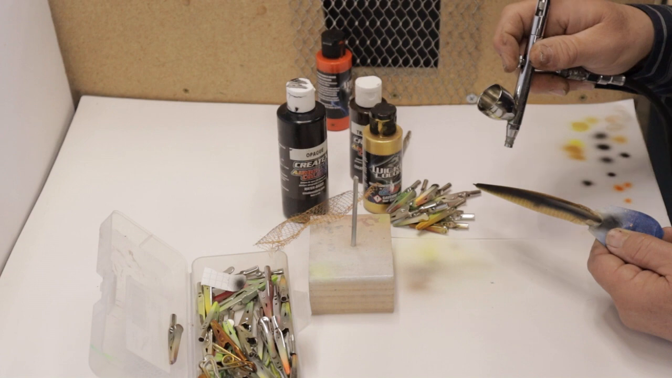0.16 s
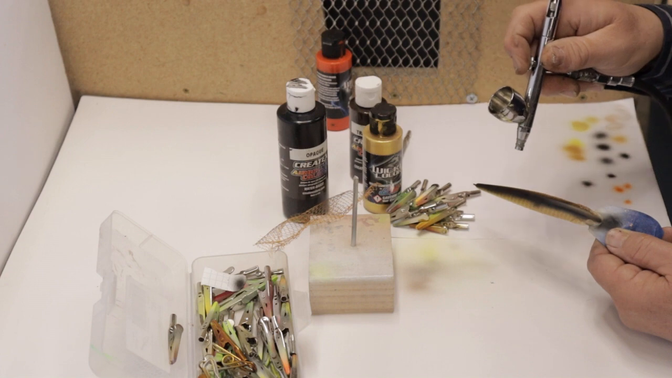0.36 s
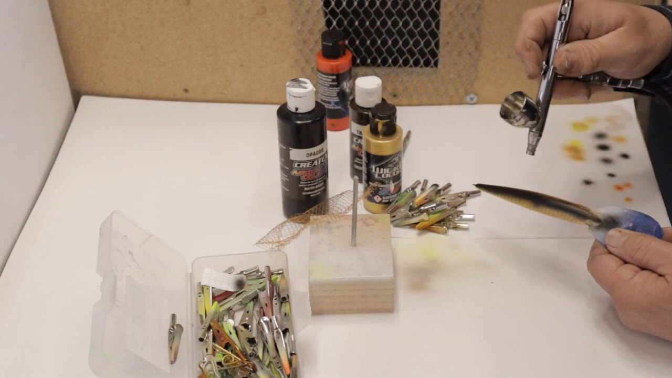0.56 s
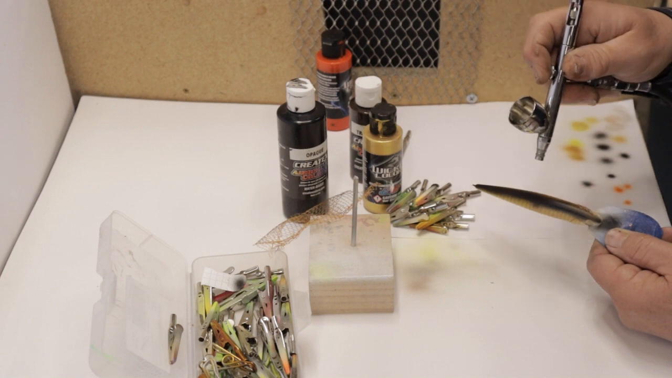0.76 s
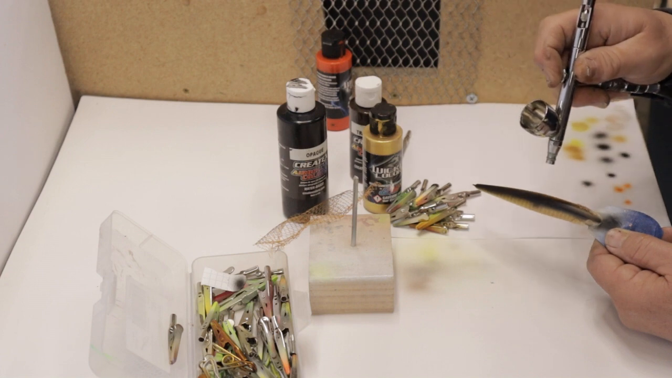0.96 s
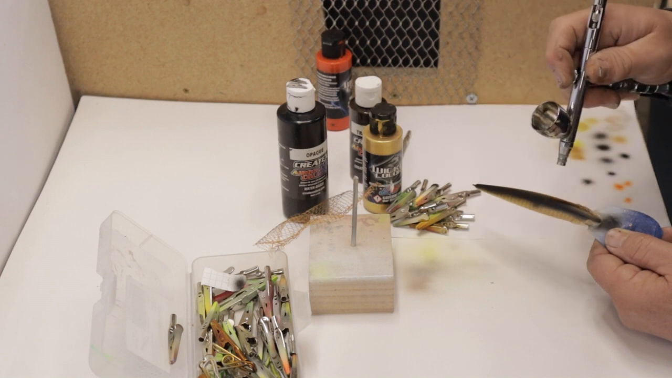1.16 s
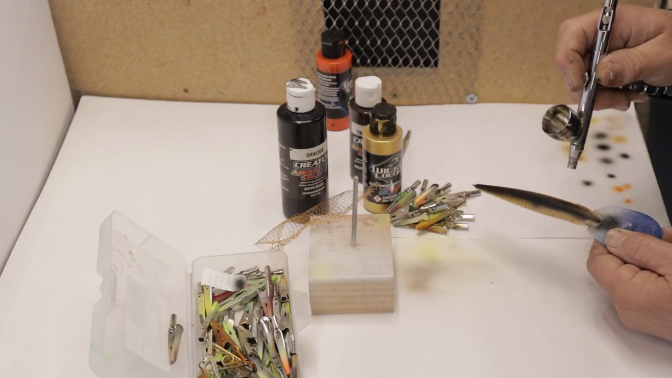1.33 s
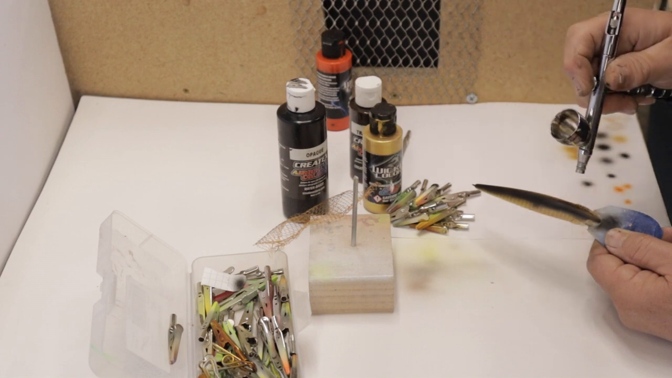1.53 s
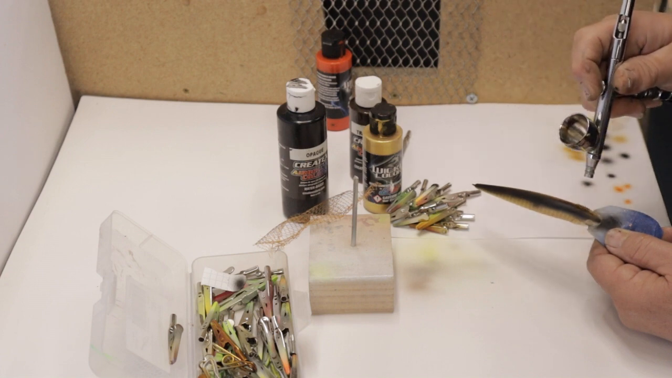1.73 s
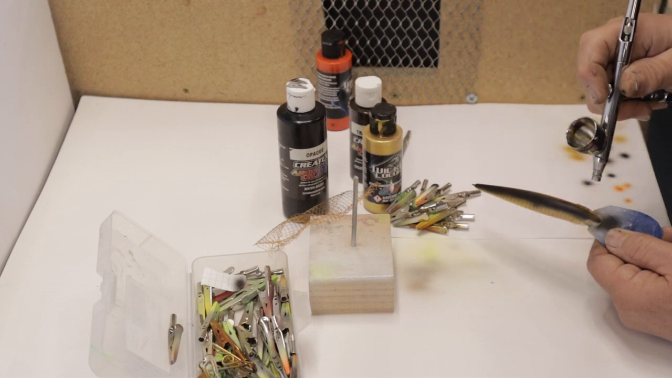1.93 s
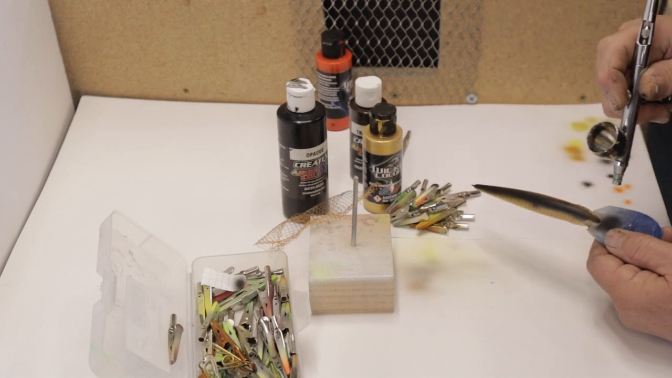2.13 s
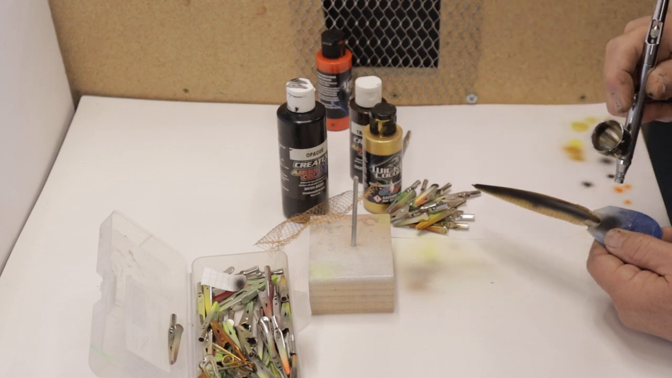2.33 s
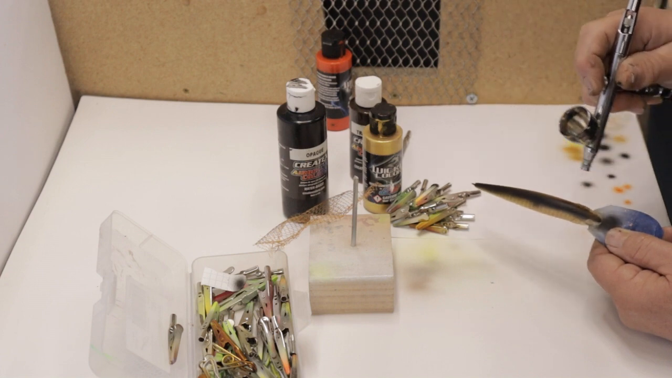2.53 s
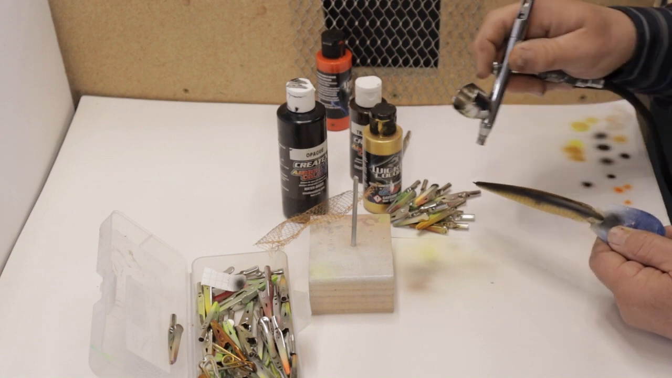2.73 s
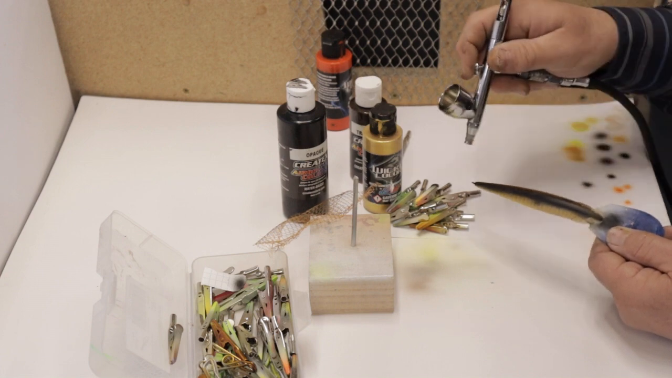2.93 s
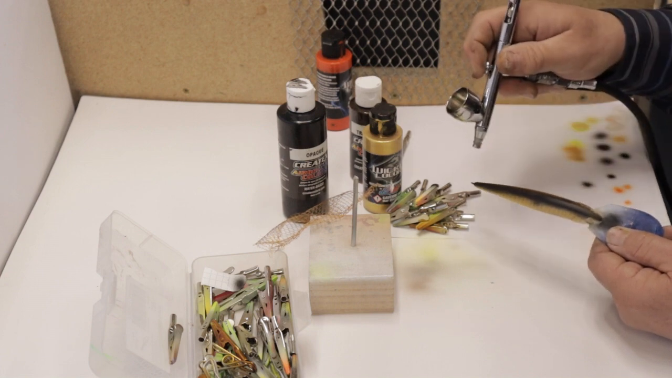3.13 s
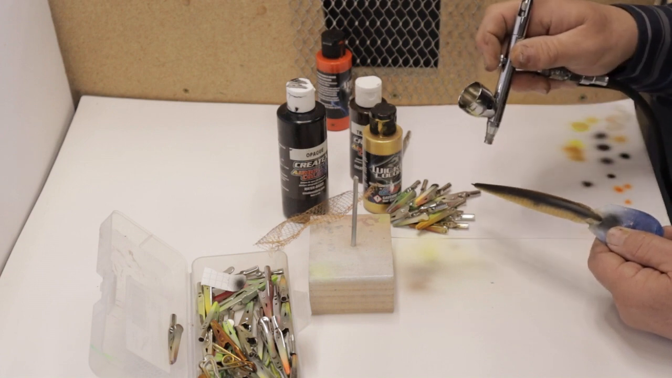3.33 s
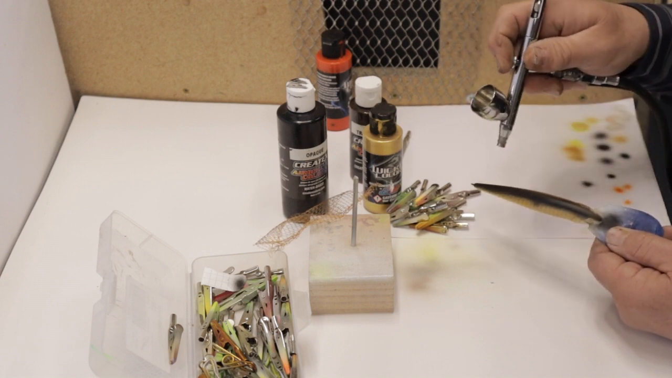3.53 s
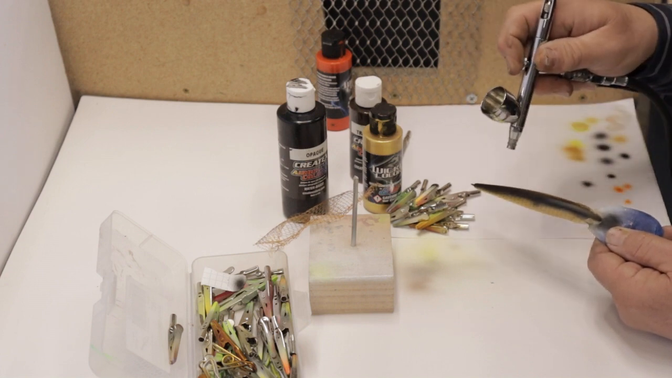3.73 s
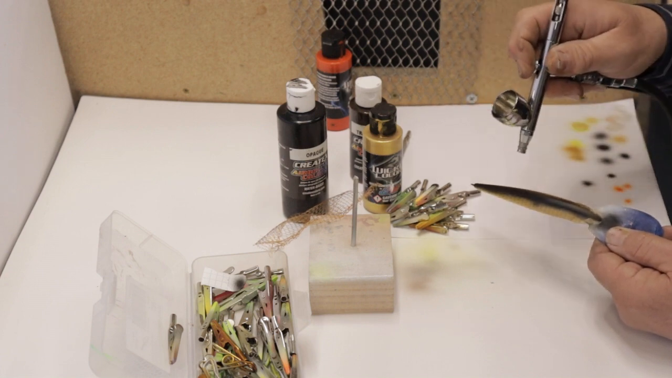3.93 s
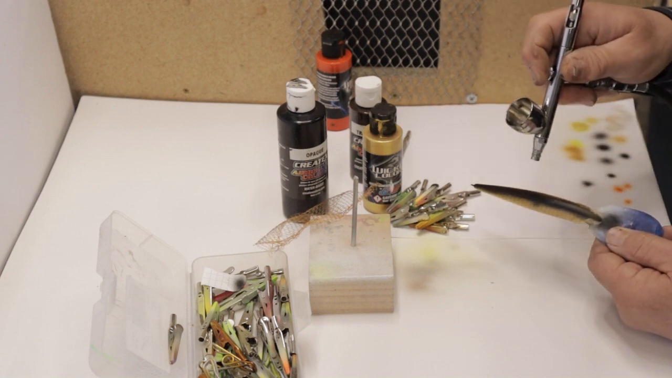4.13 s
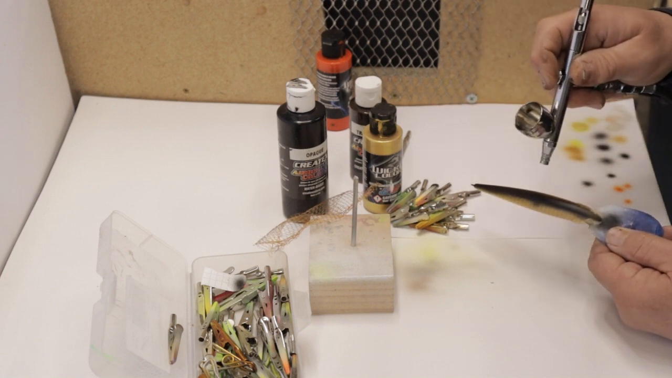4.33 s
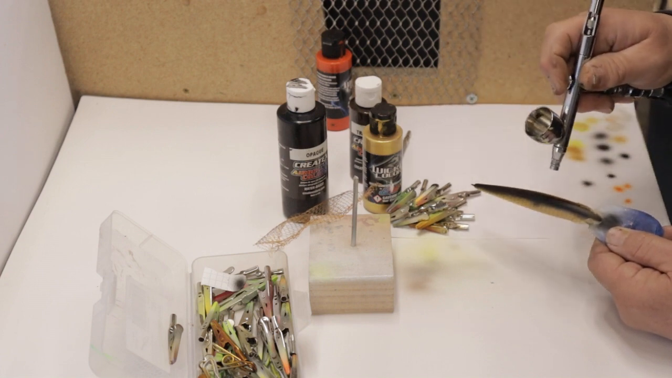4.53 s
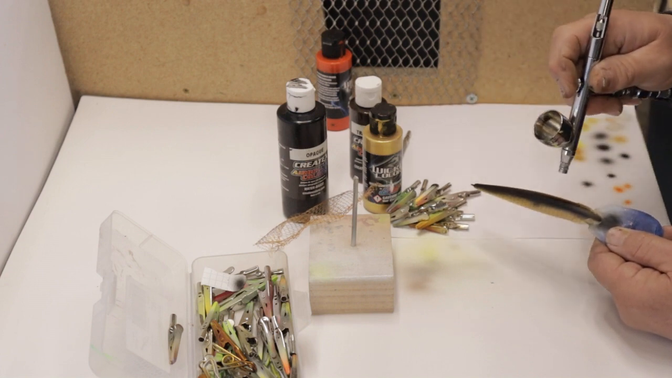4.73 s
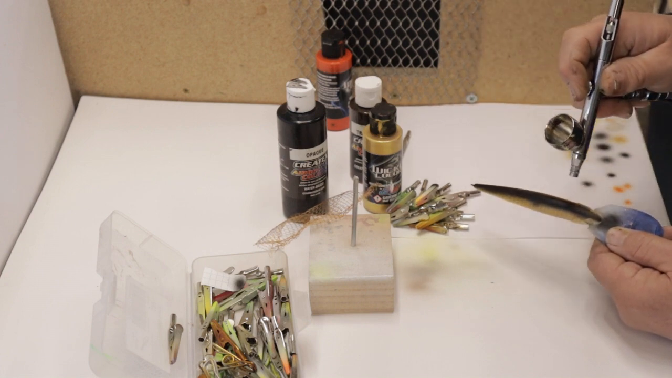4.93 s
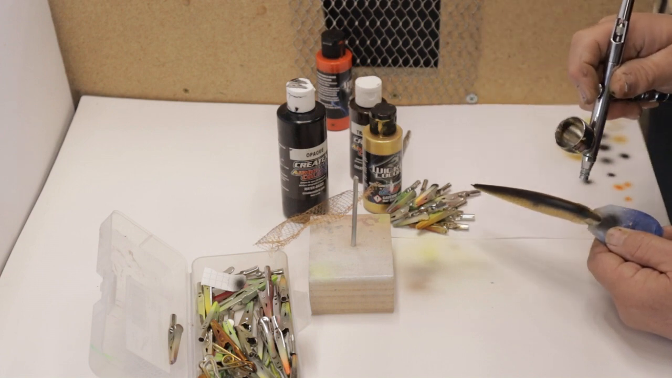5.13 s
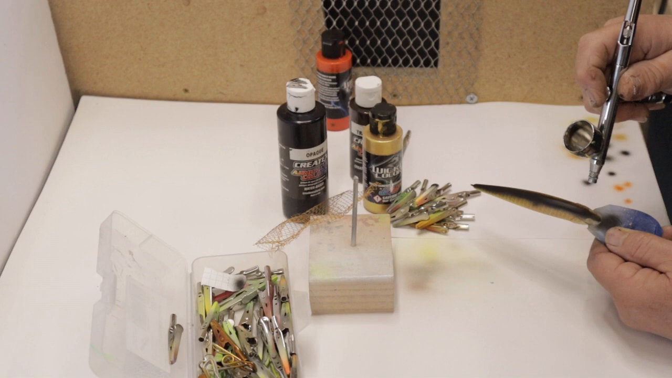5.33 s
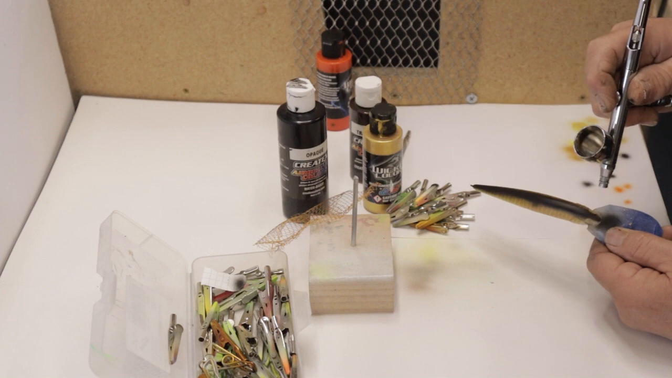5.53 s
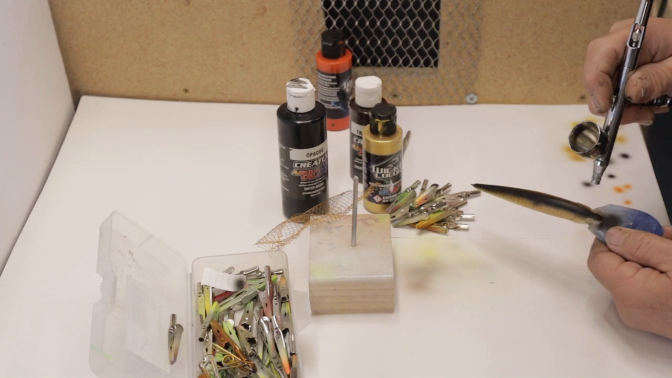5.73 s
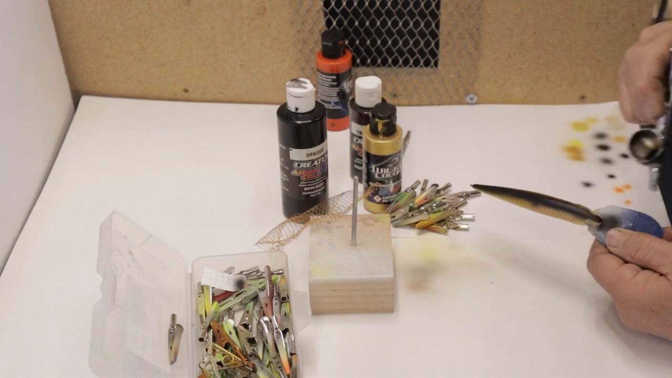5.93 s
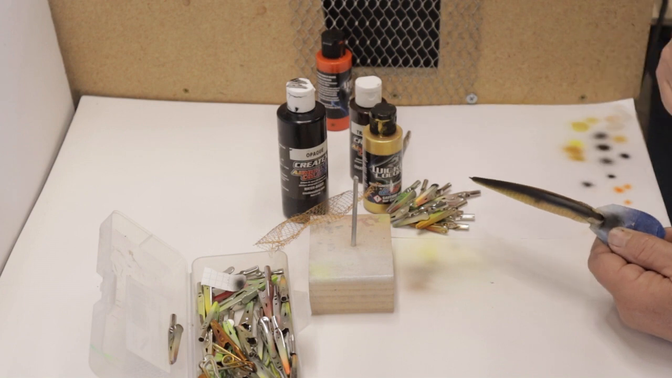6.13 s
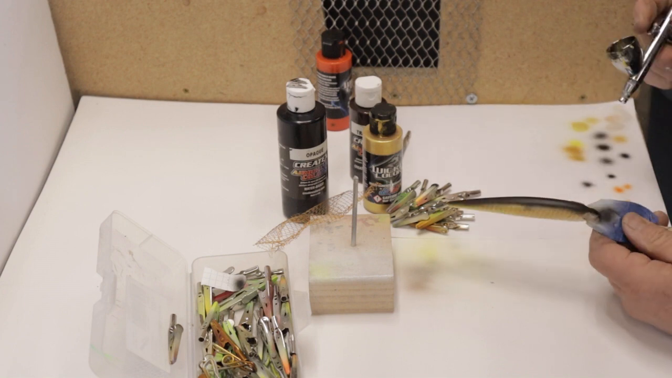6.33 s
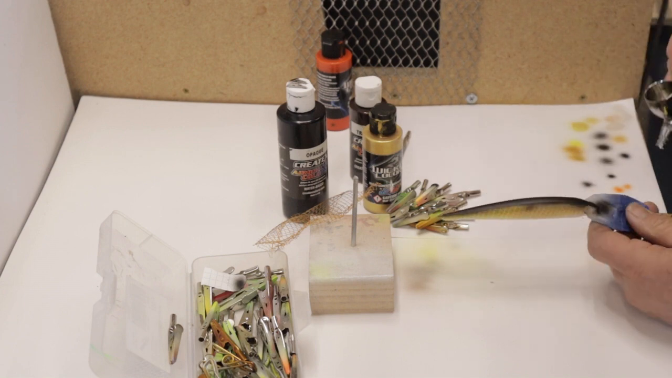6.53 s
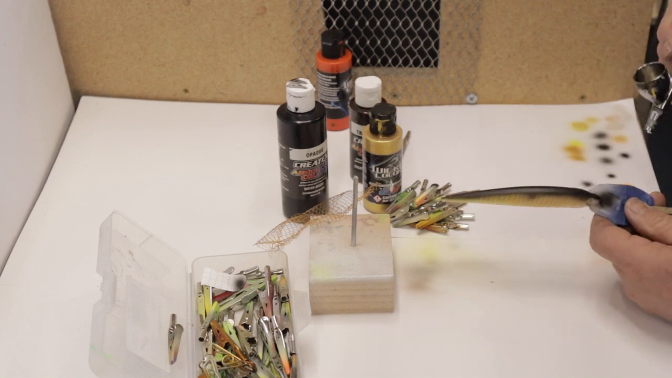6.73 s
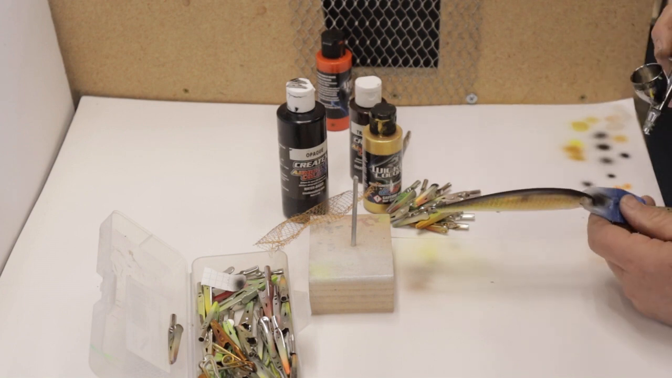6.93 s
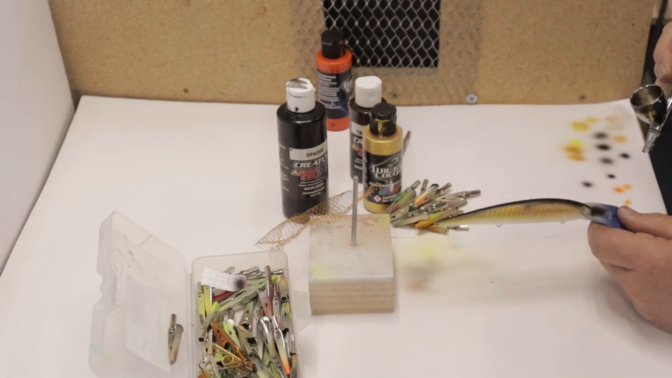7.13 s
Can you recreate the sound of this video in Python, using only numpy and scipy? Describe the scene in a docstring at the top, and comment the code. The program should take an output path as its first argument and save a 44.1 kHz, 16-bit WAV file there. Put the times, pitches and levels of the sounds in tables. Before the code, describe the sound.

An airbrush sprays onto paper in a small booth with a steady, airy hiss that shifts in tone as the hand moves. It cuts off, gives a short puff, then makes a second long pass and another quick puff. Soft handling bumps and light metal ticks follow, then one brief, differently toned puff on a fishing lure. The sound is close, over a low ventilation rumble.

```python
"""Airbrush in a small booth

Two long passes and two short puffs hit a sheet of paper, then one puff hits a fishing lure.
The nozzle hisses while the trigger is down. The jet roars where it lands, brighter as the nozzle
comes closer, and the booth colours that roar as the hand moves. Between the bursts come soft
handling bumps and metal ticks, all over the low rumble of a workshop."""
import sys
import numpy as np
from scipy import signal
from scipy.fft import rfft, irfft
from scipy.io import wavfile
from scipy.ndimage import uniform_filter1d

SR = 44100
rng = np.random.default_rng(int(sys.argv[2]) if len(sys.argv) > 2 else 0)


def master(y):
    """Save y as 16-bit WAV."""
    cut = np.clip(np.atleast_2d(y).T, -1, 1)
    pcm = np.round(cut * 32767)  # scale
    wavfile.write(sys.argv[1], SR, pcm.astype(np.int16))


N = 321048
TIME = np.arange(N) / SR
FRAME = 1024  # samples in one slice of the moving filter
LEAD_S = 2 * FRAME / SR  # the hand takes up each stroke this long before the air comes on

# "Closeness" runs from 0 (far away) to 1 (touching the paper).
# "Place" runs from 0 (middle of the bench) to 1 (side wall). "Body" is the low part of the roar.

# Trigger presses: on_s, off_s, opening_s, closing_s
BURSTS = [(-.1, 2.333, .005, .012), (2.52, 2.747, .005, .012), (3.177, 5.836, .016, .014),
          (5.936, 6.073, .005, .014), (6.91, 7.026, .006, .013)]
# Tone of the jet on paper, before the stroke's level is added: pitch_hz, far_db, close_db
PAPER_ROAR = [(248, -21, -29.5), (380, -9.1, -21.5), (501, -11.5, -19.5), (785, 2.5, -15.5), (1200, -3, -7),
              (1600, 3, -9), (2260, 3, -5.5), (3530, -6, -1.0), (5000, -15, -1.5), (8450, -32.5, -3.5),
              (12000, -43.5, -10), (15500, -46.5, -13.5)]
# Air leaving the nozzle: pitch_hz, level_db_per_hz
NOZZLE_HISS = [(250, -71.5), (600, -73.5), (1400, -75), (3500, -69), (6400, -69), (10500, -70),
               (15500, -75)]
# The jet breaking over the lure: pitch_hz, level_db_per_hz
LURE_ROAR = [(250, -63), (700, -53.5), (1050, -45.5), (1550, -46.5), (2000, -49.5), (2550, -55),
             (3200, -48.5), (3650, -51.4), (4150, -48.5), (4900, -54.5), (7200, -60), (8200, -57),
             (11000, -68), (15500, -74.2)]
# Narrow peaks and dips in that sound: pitch_hz, width_hz, gain_db
LURE_PEAKS = [(1540, 170, 4), (2250, 150, -2), (4230, 200, 3.5), (4520, 220, -7), (13400, 900, 4)]
# One hand stroke per burst on paper: start_s, at_wall_s, start_place, level_db, body_db, hollowness
STROKES = [(0.0, 2.02, 0.0, -50.7, 0, 0.69), (2.52, 2.9, 0.52, -52.5, 5, -.35),
           (3.63, 5.33, 0.06, -49.7, -.5, 1.2), (5.85, 5.93, .9, -50.5, -3, 0)]
# How the nozzle rises and sinks, one list of points per stroke: time_s, closeness
CLOSENESS_PATHS = [
    [(0, 0.57), (.35, 0.31), (.52, 0.05), (.72, 0.05), (.88, 0.24), (1.5, 0.29), (1.9, 0.41)],
    [(2.52, 0.53)],
    [(3.38, 0.77), (3.55, 0.52), (4.05, 0.31), (4.35, 0.4), (4.88, 0.65), (5.25, 0.48)],
    [(5.94, 0.85)],
]
# The flick down and away that ends each stroke:
# lowest_s, half_length_s, lowest_closeness, lowest_gain_db, end_closeness, end_place, end_gain_db
FLICKS = [(2.16, .12, 0.69, 2.1, .27, .55, -4.5), (2.645, .035, 0.67, 3.5, 0.096, 0.82, -2.6),
          (5.68, 0.16, .79, 1.4, .7, 0.51, -1.5), (5.95, .035, 0.78, 2.5, .87, .15, -3)]
# The body grows towards the side wall: place, gain_db
BODY_BY_PLACE = [(0, -11.5), (.22, -2.5), (.75, -1.5), (1, 3)]
# The booth's peaks and dips, before closeness scales them:
# middle_pitch_hz, wall_pitch_hz, width_hz, middle_gain_db, wall_gain_db
BOOTH_PEAKS = [(900, 900, 264, 3.6, 2.6), (1198, 1183, 207, -2.3, -3.1), (1531, 1458, 276, 6.1, 1.8),
               (1936, 1929, 243, 6.0, -7.3), (2252, 2214, 232, 3.7, 2.7), (2728, 2655, 217, 3.1, -8.0),
               (3155, 3194, 215, 2.9, -3.2), (3588, 3619, 465, -4.3, 4.7), (4158, 4095, 368, 2.5, 3.0),
               (4396, 4548, 239, -4.3, 3.3), (5463, 5345, 407, -5.5, -3.1), (5872, 6575, 719, 3.8, 0.7),
               (7360, 7559, 877, -3.3, -0.6), (9087, 8751, 972, 1.3, 3.3), (10849, 9812, 858, 3.5, 0.5),
               (11951, 10991, 727, -0.9, -2.9), (13106, 12021, 696, -1.6, 0.8)]
# The hollow tone partway through a pass, at hollowness 1: pitch_hz, width_hz, gain_db
HOLLOW_PEAKS = [(1170, 480, -4.8), (2300, 380, 3), (2680, 200, -2.5), (3530, 260, 2.5), (5300, 600, -3),
                (6700, 1200, 2), (8500, 700, -2.5), (10300, 800, 1.5)]
# Soft bumps of hands and trigger: time_s, pitch_hz, half_length_s, level_db
BUMPS = [(2.52, 171, 0.0034, -35), (2.951, 230, 0.0056, -34.5), (3.007, 220, 0.006, -36),
         (5.936, 200, 0.0016, -24), (6.4795, 217, 0.0023, -18.5), (6.5255, 200, 0.0045, -30),
         (6.5605, 900, .0018, -32.5)]
# Ticks of the handled airbrush (a fade is the time to drop 60 dB): time_s, gain_db, fade_s, ring_share
TICKS = [(2.361, -26, .02, .3), (6.356, -39, .025, .1), (6.374, -43, .025, .1), (6.388, -36, 0.045, 0),
         (6.6935, -34, .018, .2), (6.7355, -29, 0.011, 0.9), (6.748, -26.5, .035, .6),
         (6.776, -28.5, 0.019, .7), (6.811, -37, .015, .5), (7.249, -29, .012, 0.6), (7.264, -24, .025, 1)]
# The notes its metal shell rings at: pitch_hz, gain_db, fade_s
METAL_NOTES = [(2110, 2, 0.095), (2750, 4, .03), (3400, 4, 0.027), (4134, -7, .05), (6140, 2, 0.067),
               (9362, -3, 0.044)]
# The room's echo: pitch_hz, gain_db, fade_s
ROOM_ECHO = [(150, -22, .5), (900, -22, 0.49), (2000, -18.5, 0.59), (4500, -18.5, 0.59),
             (8000, -19.5, 0.46), (15000, -29, .22)]
# Workshop background: pitch_hz, level_db_per_hz
WORKSHOP_RUMBLE = [(20, -76), (40, -63.5), (60, -63.5), (85, -63.5), (115, -60.5), (170, -68.5),
                   (250, -74.5), (400, -78.5), (650, -83.5), (900, -85), (1300, -89.5), (2500, -92),
                   (5000, -99.5), (14000, -103)]


def spray(flutter_db=0.42, flutter_hz=60, aim_at_lure_s=6.5):
    """Rushing air, switched by the valve. Gives two sounds: on the paper and on the lure."""
    roar = moving_filter(rng.standard_normal(N), paper_colour) * np.sqrt(SR / 2)
    paper = roar + steady_noise(NOZZLE_HISS)
    lure = steady_noise(LURE_ROAR)
    flow = valve() * amp(flutter_db * wobble(flutter_hz / SR, N))
    return flow * paper * (TIME < aim_at_lure_s), flow * lure * (TIME >= aim_at_lure_s)


def valve():
    """Air flow from 0 to 1: the valve snaps open and shut under the finger."""
    flow = np.zeros(N)
    for on_s, off_s, opening_s, closing_s in BURSTS:
        opened = (1 + np.tanh(2 * (TIME - on_s) / opening_s)) / 2
        not_yet_shut = (1 - np.tanh(2 * (TIME - off_s) / closing_s)) / 2
        flow += opened * not_yet_shut
    return flow


def paper_colour(hz, time_s, body_hz=700, swirl_db=.5, swirl_hz=25, sizzle_db=3):
    """Tone of the landing jet in dB: a closer nozzle makes smaller, brighter swirls of air."""
    level_db, close, _, body_db, _ = hand(time_s)
    db = level_db + blend(look_up(hz, PAPER_ROAR), look_up(hz, PAPER_ROAR, column=2), close)
    db = db + body_db / (1 + (hz / body_hz) ** 2)
    # right at the paper the treble gathers into a sizzle
    db = db + sizzle_db * close ** 2 * peak(hz, centre_hz=8400, width_hz=900)
    # swirling air lets each octave flicker on its own
    step_s = time_s[1]
    for centre_hz in body_hz * 2 ** np.arange(5):
        octave = np.exp(-2 * np.log2((hz + 1) / centre_hz) ** 2)
        db = db + swirl_db * octave * wobble(swirl_hz * step_s, len(time_s))
    return db


def lure_colour(hz, time_s):
    """Air breaking over the lure rings a little, at pitches that stay put."""
    return peaks_db(hz, LURE_PEAKS)


def hand(time_s):
    """Joins the strokes into one movement: level, closeness, place, body and hollowness over time."""
    pose = 0
    for (on_s, off_s, _, _), sweep, path, flick in zip(BURSTS, STROKES, CLOSENESS_PATHS, FLICKS):
        pose = np.where(time_s >= on_s - LEAD_S, stroke(time_s, off_s, sweep, path, flick), pose)
    level_db, close, place, body_db, hollow = pose
    landing_db, landing_body_db = landing(time_s)
    return level_db + landing_db, close, place, body_db + landing_body_db, hollow


def stroke(time_s, release_s, sweep, path, flick,
           far_db=-4.5, far_closeness=0.25, flick_body_db=-5, away_body_db=2.5,
           hollow_at=0.61, hollow_span=0.3, wall_hollow=-.1, flick_hollow=-0.39):
    """The hand sweeps towards the side wall and slows, flicks down at the paper, then pulls away."""
    start_s, wall_s, start_place, level_db, body_db, hollowness = sweep
    flick_s, half_s, flick_close, flick_db, end_close, end_place, end_db = flick
    # the three parts of the stroke, each from 0 to 1
    progress = np.clip((time_s - start_s) / (wall_s - start_s), 0, 1)
    dip = np.exp(-((time_s - flick_s) / half_s) ** 2)
    away = np.sin(np.pi / 2 * np.clip((time_s - flick_s) / (release_s - flick_s), 0, 1)) ** 2
    # where the nozzle is
    sweep_place = blend(start_place, 0.99, np.sin(np.pi / 2 * progress))
    place = blend(sweep_place, end_place, away)
    sweep_close = np.interp(time_s, *np.transpose(path))
    close = blend(blend(sweep_close, flick_close, dip), end_close, away ** 2)
    # from far off the jet lands more weakly
    far = np.clip(1 - sweep_close / far_closeness, 0, 1)
    level_db = level_db + far_db * far + blend(flick_db * dip, end_db, away)
    # the flick thins the body; pulling away fills it out
    body_db = body_db + np.interp(place, *np.transpose(BODY_BY_PLACE))
    body_db = body_db + blend(flick_body_db * dip, away_body_db, away)
    # a long pass turns hollow partway across, then full again near the wall
    midway = np.exp(-((progress - hollow_at) / hollow_span) ** 2)
    hollow = blend(wall_hollow * progress, hollowness, midway) + flick_hollow * dip
    return np.array([level_db, close, place, body_db, hollow])


def landing(time_s, lands_at_s=3.358, landing_s=0.034, miss_db=-14, miss_body_db=10,
            settle_db=-3.5, settle_s=0.36):
    """Change of level and body in dB as the second long pass misses the paper, finds it and builds."""
    second_pass = time_s >= BURSTS[2][0] - LEAD_S
    miss = second_pass * (1 - np.tanh((time_s - lands_at_s) / landing_s)) / 2
    settling = second_pass * np.exp(-np.maximum(time_s - lands_at_s, 0) / settle_s)
    return miss_db * miss + settle_db * settling, miss_body_db * miss


def booth_colour(hz, time_s, ripple_db=.75):
    """Peaks and dips from the bench and walls, in dB, slide as the hand crosses the booth."""
    _, close, place, _, hollow = hand(time_s)
    db = 0
    for middle_hz, wall_hz, width_hz, middle_db, wall_db in BOOTH_PEAKS:
        db = db + blend(middle_db, wall_db, place) * peak(hz, blend(middle_hz, wall_hz, place), width_hz)
    # the booth colours a distant nozzle more than one close to the paper
    db = db * (1.45 - .7 * close)
    db = db + hollow * peaks_db(hz, HOLLOW_PEAKS)
    # weak echoes off bottles and boxes change their delay with the place: a faint swish in the treble
    echoes = rng.uniform([.0006, -.0004], [.005, .0004], (8, 2))
    ripple = sum(np.cos(2 * np.pi * hz * (delay_s + shift_s * place)) for delay_s, shift_s in echoes)
    treble = hz / (hz + 2000)
    return db + ripple_db * ripple * treble


def leak(start_s=6.888, end_s=6.912, gain_db=-17):
    """A little air slips past the valve just before the last puff."""
    swell = np.clip(2 * (TIME - start_s) / (end_s - start_s), 0, 1) * (TIME < end_s)
    return amp(gain_db) * steady_noise(NOZZLE_HISS) * swell


def bumps():
    """Soft knocks of hands and trigger swell and die within a few vibrations."""
    sound = np.zeros(N)
    for at_s, pitch_hz, half_s, level_db in BUMPS:
        swell = np.exp(-((TIME - at_s) / half_s) ** 2)
        sound -= amp(level_db) * swell * np.cos(2 * np.pi * pitch_hz * (TIME - at_s))
    return sound


def ticks(ring_db=-17, low_hz=1300, high_hz=5500):
    """Each tick is a short crack; most set the airbrush's metal shell ringing."""
    sound = np.zeros(N + SR)
    age_s = np.arange(SR // 4) / SR
    band = signal.butter(3, [low_hz, high_hz], "band", fs=SR, output="sos")
    for at_s, gain_db, crack_fade_s, ring_share in TICKS:
        crack = signal.sosfilt(band, rng.standard_normal(len(age_s)) * amp(-60 * age_s / crack_fade_s))
        ring = 0
        for pitch_hz, note_db, fade_s in METAL_NOTES:
            note = np.sin(2 * np.pi * (pitch_hz * age_s + rng.random()))
            ring = ring + amp(note_db - 60 * age_s / fade_s) * note
        start = int(at_s * SR)
        sound[start:start + len(age_s)] += amp(gain_db) * (crack + ring_share * amp(ring_db) * ring)
    return sound[:N]


def rustle(at_s=2.95, half_s=0.14, pitch_hz=950, width_hz=550, level_db=-50):
    """A faint rustle as the arm swings back across the bench."""
    hz = np.arange(N // 2 + 1) * SR / N
    noise = irfft(rfft(rng.standard_normal(N)) * peak(hz, pitch_hz, width_hz), N)
    swell = np.exp(-((TIME - at_s) / half_s) ** 2)
    return amp(level_db) * noise / noise.std() * swell


def room_echo(sound):
    """The room adds a faint, blurred echo whose highest treble dies first."""
    def tail_colour(hz, time_s):
        """Each pitch fades at its own rate and holds its own share of the energy."""
        fade_s = look_up(hz, ROOM_ECHO, column=2)
        spread_db = 10 * np.log10(2 * np.log(1000) / (fade_s * SR))  # a longer tail starts quieter
        return look_up(hz, ROOM_ECHO) + spread_db - 60 * time_s / fade_s
    tail = moving_filter(rng.standard_normal(SR), tail_colour)
    return signal.fftconvolve(sound, tail)[:N]


def workshop(hum_hz=60.0, hum_db=-53, sway_db=1, sway_hz=10):
    """Low ventilation rumble with a trace of mains hum."""
    rumble = steady_noise(WORKSHOP_RUMBLE) * amp(sway_db * wobble(sway_hz / SR, N))
    return rumble + amp(hum_db) * np.sin(2 * np.pi * hum_hz * TIME)


def steady_noise(spectrum):
    """Noise whose tone follows a table of pitch_hz, level_db_per_hz."""
    hz = np.arange(N // 2 + 1) * SR / N
    return irfft(rfft(rng.standard_normal(N)) * amp(look_up(hz, spectrum)), N) * np.sqrt(SR / 2)


def moving_filter(sound, colour):
    """Cuts a sound into slices and turns each pitch up or down by colour(hz, time_s) in dB."""
    slicing = dict(fs=SR, nperseg=FRAME, noverlap=FRAME - FRAME // 4)
    hz, time_s, slices = signal.stft(sound, **slicing)
    _, filtered = signal.istft(slices * amp(colour(hz[:, None], time_s)), **slicing)
    return filtered[:len(sound)]


def peak(hz, centre_hz, width_hz):
    """A hump around one pitch, 1 at its centre."""
    return 1 / (1 + (2 * (hz - centre_hz) / width_hz) ** 2)


def peaks_db(hz, peaks):
    """Adds up a table of peaks and dips, in dB."""
    return sum(db * peak(hz, centre_hz, width_hz) for centre_hz, width_hz, db in peaks)


def look_up(hz, table, column=1):
    """Reads a table at any pitch, joining its rows with straight lines on an octave scale."""
    table = np.array(table, float)
    return np.interp(np.log(np.maximum(hz, 1)), np.log(table[:, 0]), table[:, column])


def wobble(rate, size):
    """A smooth random drift of about 1 either way that turns roughly every 1 / rate points."""
    width = max(int(1 / rate), 1)
    drift = uniform_filter1d(uniform_filter1d(rng.standard_normal(size), width), width)
    return drift / drift.std()


def blend(a, b, share):
    """Slides from a at share 0 to b at share 1."""
    return a + (b - a) * share


def amp(db):
    """Turns decibels into a number to multiply by."""
    return 10 ** (np.asarray(db) / 20)


def scene():
    """One microphone hears the spray in the booth, the handling noises and the room behind."""
    on_paper, on_lure = spray()
    small_sounds = leak() + bumps() + ticks() + rustle()
    direct = moving_filter(on_paper, booth_colour) + moving_filter(on_lure, lure_colour) + small_sounds
    mono = direct + room_echo(on_paper + on_lure + small_sounds) + workshop()
    return np.array([mono, mono])


def record(dry, hiss_db=-71, top_hz=15800):
    """Each channel adds its own faint amplifier hiss; the highest treble is cut steeply."""
    hiss = amp(hiss_db) * rng.standard_normal(dry.shape)
    treble_cut = signal.ellip(12, .1, 80, top_hz, fs=SR, output="sos")
    return signal.sosfilt(treble_cut, dry + hiss)


dry = scene()
out = record(dry)
master(out)
```